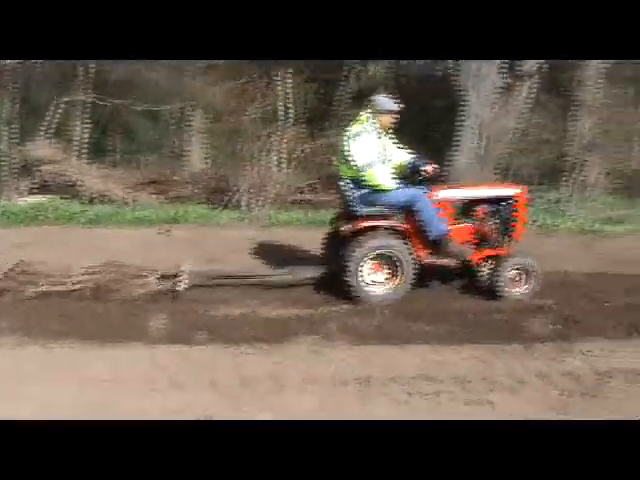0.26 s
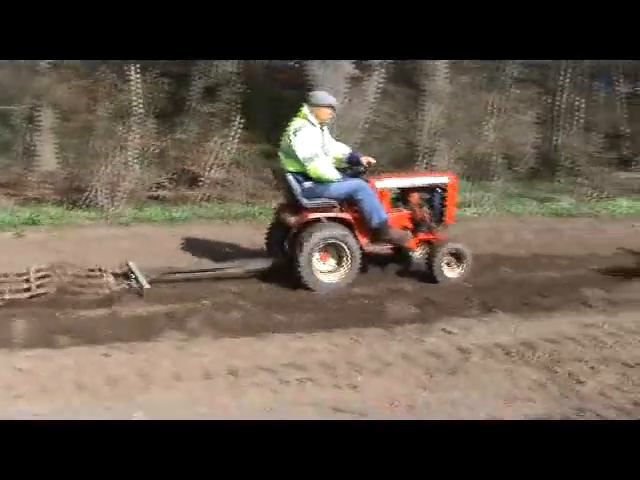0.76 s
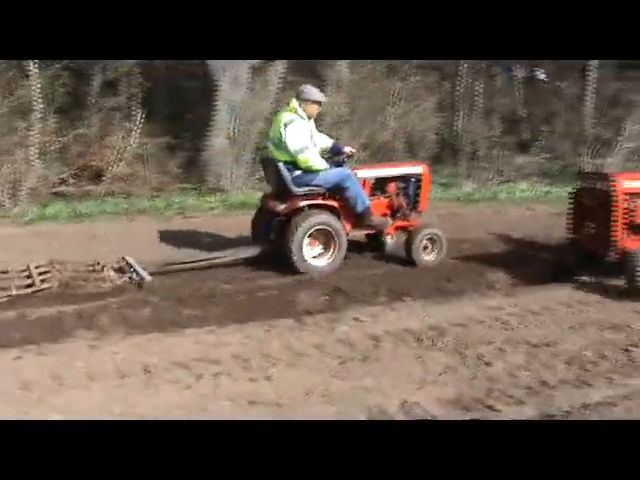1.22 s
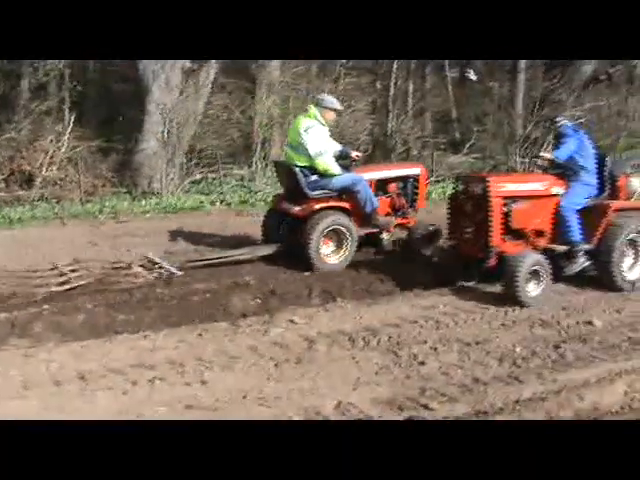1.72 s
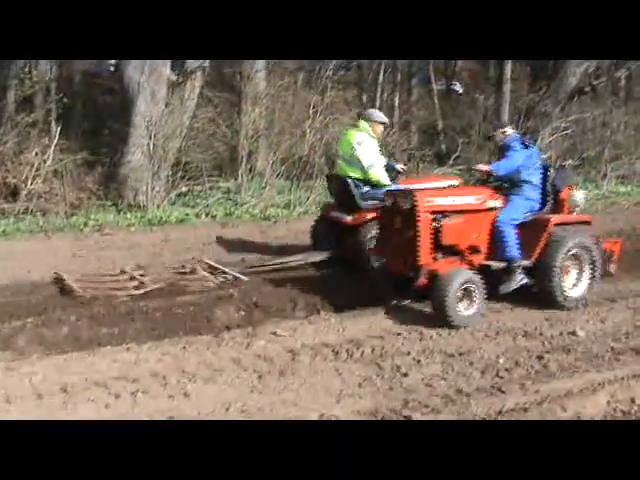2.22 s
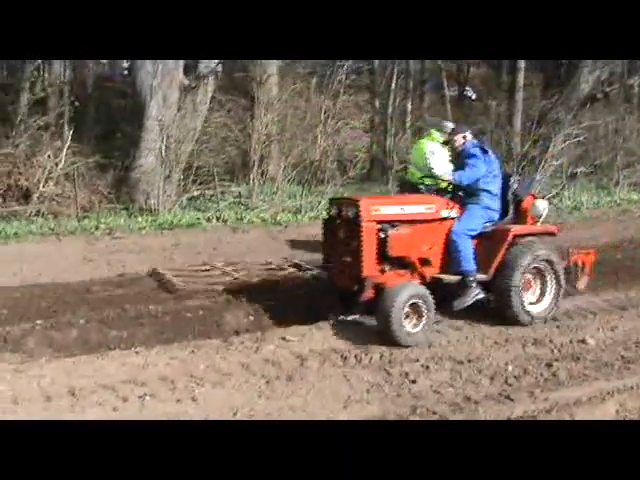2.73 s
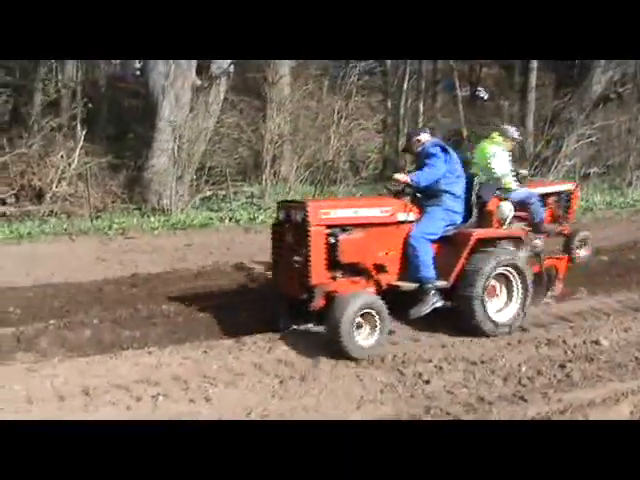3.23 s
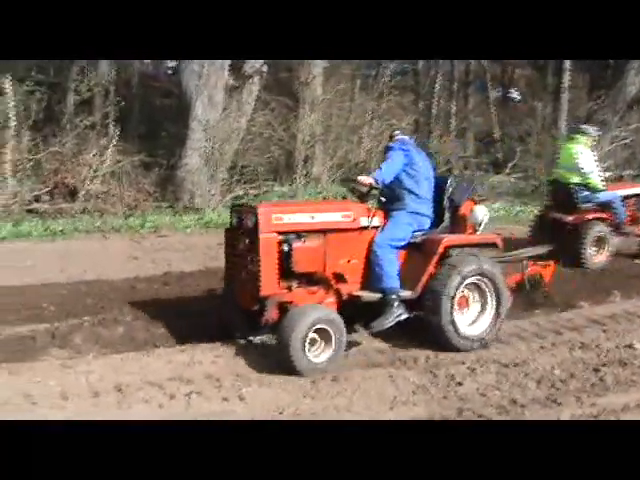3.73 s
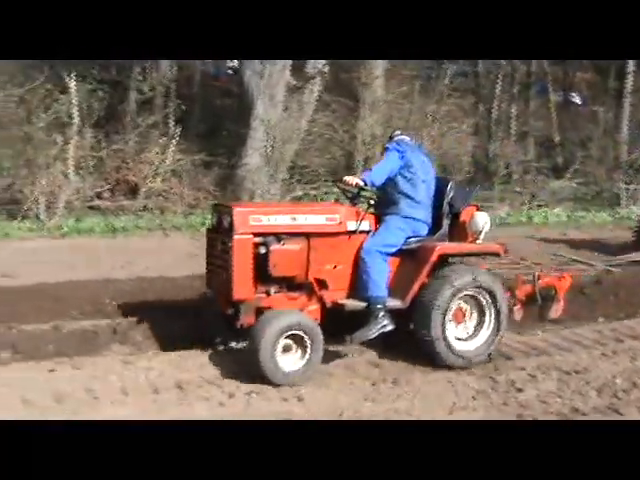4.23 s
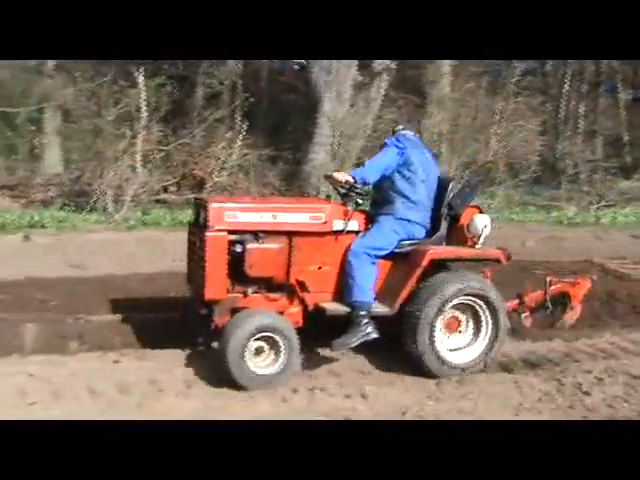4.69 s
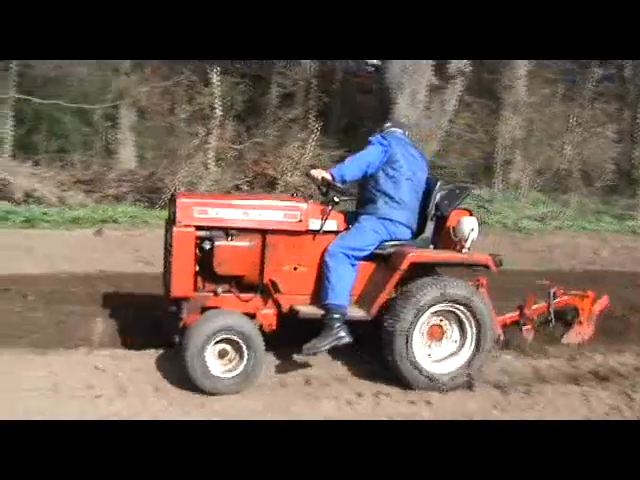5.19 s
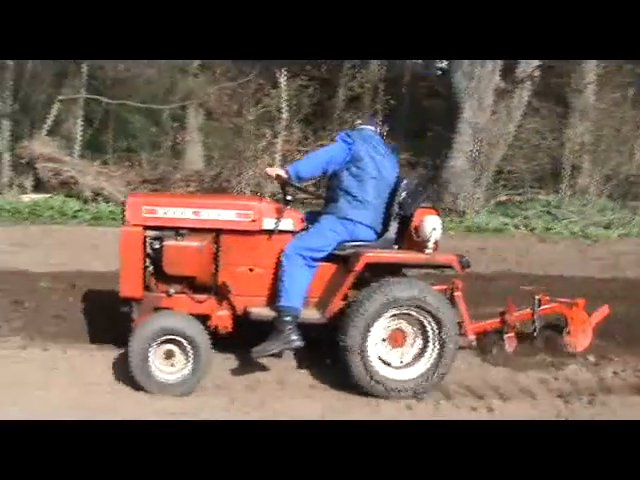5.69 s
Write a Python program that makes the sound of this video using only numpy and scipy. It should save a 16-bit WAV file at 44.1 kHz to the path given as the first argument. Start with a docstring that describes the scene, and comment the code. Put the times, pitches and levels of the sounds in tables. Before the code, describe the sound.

Two small tractor engines chug past in a field, the nearer growing louder and popping, with wind buffeting the microphone at first.

```python
"""A small twin-cylinder tractor puffs strong-weak across tilled soil in an open field: each firing
rings the exhaust pipe and drives a jet of gas that excites the tin silencer shell. A second tractor
passes further off with a slower thump. Running gear washes beneath them, and the links of a dragged
chain harrow squeal by stick-slip friction. Turbulent gusts buffet the two microphone ports, hard at
first, then in short bursts."""
import sys
import numpy as np
from scipy import signal
from scipy.fft import rfft, irfft
from scipy.io import wavfile
from scipy.ndimage import uniform_filter1d

SR = 44100
rng = np.random.default_rng(int(sys.argv[2]) if len(sys.argv) > 2 else 0)


def store_pcm(level_fs):
    """Save levels as 16-bit WAV."""
    pcm = np.round(np.clip(level_fs, -1, 1) * 32767).astype(np.int16)
    wavfile.write(sys.argv[1], SR, np.atleast_2d(pcm).T)


N = 262395

NEAR_FIRING_HZ, FAR_FIRING_HZ = 24.55, 19.3
THUMP_MS, SIGH_MS, GAS_MS, INTAKE_MS = -7.5, -7, -3.5, 21   # onsets from a firing's loudest moment

# Arrival of the firings against a steady beat, from speed drift and distance: time_s, lag_ms
NEAR_FIRING_LAG = [(0, -19.5), (.75, -19.5), (1.0, -17.5), (1.25, -18.4), (2.5, -14.6), (2.75, -17.8),
                   (3.5, -15.7), (3.75, -17.5), (4.25, -17.8), (4.65, -16.2), (5.0, -17.9), (5.25, -17.4),
                   (5.45, -18.9), (5.75, -17.5)]
FAR_FIRING_LAG = [(0, -17), (.8, -12), (1.2, -9), (1.6, -8.3), (2.0, -10), (2.4, -12), (2.8, -13.5),
                  (3.3, -15), (4.0, -14), (5.2, -10), (5.95, -8)]
# Course of the near engine: time_s, thump_db, puff_db, weak_cylinder_db, left_right_db
NEAR_LEVELS = [(0, -38, -48.5, 2, -30), (1.0, -34.5, -45, -1, -14), (1.5, -30.5, -42.5, -0.5, -7),
               (2.0, -32.5, -40, -3.5, -4), (2.5, -27.5, -39.5, -2.5, -3), (3.0, -31.5, -42, 2, -2),
               (3.5, -28.5, -37.5, -2, -3.5), (4.0, -28.5, -37, -5, -4), (4.5, -27, -34, -4.5, -1),
               (5.0, -25, -34.5, -8, -4), (5.5, -33, -35.5, -1.5, -1.5), (5.95, -26, -36, -6, -4)]
# Course of the far engine: time_s, thump_db, bark_db
FAR_LEVELS = [(0, -27, -38), (1.0, -33.5, -34.5), (1.5, -37, -36.5), (2.0, -33, -38.5), (2.5, -35.5, -56),
              (3.0, -35, -38.5), (4.0, -40, -37.5), (5.0, -53, -36), (5.95, -56, -44)]
# Hardest near exhaust pops: time_s, jet_db, sizzle_db, shell_low_db, shell_middle_db, shell_top_db
HARD_POPS = [(1.042, -48, -64, -57, -53, -56), (1.409, -47, -59, -55, -55, -52),
             (1.447, -46, -59, -51, -53, -55), (1.856, -45, -58, -55, -55, -52),
             (1.897, -52, -59, -50, -55, -57), (1.937, -54, -60, -53, -53, -52),
             (2.265, -51, -62, -50, -55, -48), (2.346, -44, -60, -42, -58, -50),
             (2.428, -54, -68, -55, -41, -45), (2.51, -50, -68, -40, -44, -55),
             (2.591, -54, -68, -42, -46, -48), (2.672, -65, -61, -42, -55, -53),
             (2.873, -54, -55, -55, -55, -51), (2.915, -40, -60, -56, -55, -53),
             (2.957, -45, -64, -58, -50, -41), (2.997, -37.5, -56, -54, -55, -41),
             (3.076, -39, -66, -41, -54, -46), (3.159, -48, -62, -43, -52, -48),
             (3.243, -54, -77, -52, -54, -39), (3.324, -60, -61, -55, -58, -42.5),
             (3.405, -52, -64, -35, -39, -53), (3.447, -54, -59, -50, -48, -47),
             (3.489, -42, -56, -39, -52, -49), (3.568, -43, -58, -43, -56, -39),
             (3.61, -57, -57, -55, -55, -55), (3.65, -64, -64, -51, -54, -42),
             (3.73, -49, -68, -36, -55, -48), (3.812, -47, -62, -48, -54, -44),
             (3.852, -52, -57, -55, -55, -53), (3.974, -48, -61, -41, -52, -39),
             (4.055, -63, -68, -39, -56, -44), (4.219, -44, -60, -48, -54, -48),
             (4.301, -47, -55, -51, -48, -38), (4.382, -40, -52, -43, -50, -46.5),
             (4.464, -53, -56, -39, -54, -48), (4.627, -45, -57, -46, -52, -48),
             (4.709, -50, -64, -51, -50, -49), (4.79, -45, -54, -40, -40, -63),
             (4.87, -37, -68, -39, -50, -50), (4.952, -50, -60, -38, -60, -46),
             (5.033, -57, -56, -38, -50, -55), (5.114, -60, -62, -48, -52, -44),
             (5.196, -47, -50, -52, -33.5, -46), (5.277, -42, -57, -35, -39, -35),
             (5.36, -56, -57, -31, -36, -52), (5.439, -48, -55, -37, -55, -35),
             (5.521, -52, -49, -34, -51, -53), (5.603, -36, -55, -35, -56, -40),
             (5.686, -33, -43, -46, -46, -52), (5.766, -38, -51, -48, -42, -44),
             (5.847, -41, -58, -44, -36, -41)]
# Modes of the exhaust pipes, near silencer shell, and bonnet and mudguards: pitch_hz, level_db, t60_s
NEAR_PIPE_MODES = [(70.2, 1, 0.071), (119.3, -3, 0.072), (97, -11.5, 0.054), (151, -39, 0.13),
                   (179.7, -15.5, 0.58), (223, -5.5, 0.034)]
FAR_PIPE_MODES = [(95, -21, 0.083), (114.1, 0.5, 0.14), (142, -5.5, 0.1), (162.5, 1.5, 0.092),
                  (213.4, -14.5, 0.25)]
SHELL_MODES = [(1515, -9, 0.022), (1903, -6, 0.037), (2020, -7.5, 0.038), (3280, -19, .02),
               (3470, -1, 0.013), (4420, -4.5, 0.01), (4840, -3.5, 0.024), (5280, -6, 0.014),
               (5860, -5, .012)]
PANEL_MODES = [(775, -6, 0.047), (1520, 4, 0.021), (1985, 2.5, 0.026), (3482, -4, 0.044),
               (6260, -26, 0.035)]
# Exhaust noise of the near puff, its sizzle and the far bark: frequency_hz, density_db
PUFF_SPECTRUM = [(600, -20), (1500, -3), (3000, 4.5), (5000, 1.5), (8000, 0), (11000, -2.5), (14000, -23),
                 (16000, -15)]
SIZZLE_SPECTRUM = [(8000, -30), (11000, -6), (13000, 7), (15500, -10)]
BARK_SPECTRUM = [(450, 6), (700, 4), (1500, 1.5), (2200, 5), (3500, -2.5), (6000, -7.5), (11000, -16),
                 (16000, -52)]
# Strength of the wind on the ports: time_s, level_db
GUST_LEVELS = [(0, -11.5), (.09, -16), (.13, -14.5), (.16, -17), (.25, -15), (.36, -18.5), (.43, -13),
               (.48, -14), (.54, -19.5), (.66, -12.5), (.7, -18), (.73, -20.5), (.77, -19), (.79, -27),
               (.83, -32), (.87, -41), (.93, -34), (1.05, -52.5), (1.45, -43.5), (1.52, -61), (2.08, -52),
               (2.13, -43), (2.35, -50), (2.55, -39), (2.68, -46), (2.85, -46), (3.05, -49), (3.22, -43),
               (3.27, -36), (3.48, -41), (3.55, -48.5), (3.85, -43.5), (3.91, -36.5), (4.2, -39),
               (4.68, -36.5), (4.72, -24.5), (4.88, -23), (4.955, -22.5), (4.985, -31.5), (5.1, -35),
               (5.7, -33), (5.84, -28.5), (5.95, -29)]
# Wind noise in phase on both ports, in antiphase, and as deep rumble: frequency_hz, density_db
IN_PHASE_SPECTRUM = [(20, -31), (45, -40), (81, -1.5), (173, 1.5), (305, -4.5), (516, -17), (1470, -54),
                     (3000, -69), (6000, -99)]
ANTIPHASE_SPECTRUM = [(20, -40), (59, -31), (124, 0), (242, 2), (436, -2), (768, -15), (1440, -27),
                      (3000, -44), (6000, -63), (12000, -110)]
RUMBLE_SPECTRUM = [(20, -43), (38, 2), (103, 7.5), (181, -1), (400, -29.5), (1000, -101)]
# Fast eddies that slap the ports and flutter: time_s, left_gain, right_gain, flutter_db
FAST_EDDIES = [(0.903, -0.3, 0.19, -25.5), (1.0, 0.054, -0.061, -46), (1.178, -0.14, 0.18, -33.5),
               (1.28, -0.17, 0.099, -35), (1.46, 0.059, -0.051, -43), (2.295, -0.19, 0.16, -37.5),
               (2.42, -0.072, 0.13, -35.5), (2.501, -0.11, 0.14, -41), (2.821, 0.13, -0.074, -41),
               (2.901, 0.054, -0.054, -32.5), (3.256, -0.12, 0.061, -32), (3.481, 0.062, 0.026, -33),
               (3.943, -0.14, 0.14, -39), (4.055, 0.17, -0.16, -30.5), (4.132, 0.013, 0.13, -42),
               (4.149, 0.11, -0.14, -44), (4.319, -0.11, -0.0017, -29), (4.391, -0.15, 0.066, -40),
               (4.45, -0.029, 0.023, -42), (4.547, 0.15, -0.013, -30), (4.642, -0.13, 0.21, -31.5),
               (4.717, -0.16, 0.32, -26.5), (4.828, 0.2, -0.38, -30), (5.018, -0.14, 0.29, -36),
               (5.162, -0.025, 0.0017, -27), (5.253, -0.18, 0.17, -27.5), (5.331, 0.21, -0.28, -30),
               (5.405, 0.067, 0.11, -35), (5.456, 0.097, -0.1, -32), (5.63, 0.081, -0.22, -27.5),
               (5.732, 0.26, -0.097, -38), (5.926, -0.39, 0.38, -20.5)]
# Slow eddies that thud on both ports: time_s, pitch_hz, peak_db
SLOW_EDDIES = [(0.9, 60, -30), (1.168, 55, -36), (1.28, 55, -47), (2.144, 70, -25), (2.3, 45, -25),
               (2.425, 50, -36), (3.003, 45, -42), (3.325, 45, -36), (3.404, 45, -40), (3.922, 55, -26),
               (4.005, 45, -31), (4.178, 55, -27), (4.54, 55, -40), (4.826, 60, -31), (5.029, 55, -27),
               (5.167, 45, -40), (5.278, 55, -31), (5.436, 55, -25), (5.605, 55, -26), (5.758, 55, -34)]
# Course of the wash of running gear, fans and soil: time_s, level_db, treble_db
GEAR_LEVELS = [(0.0, -38.5, -6), (0.5, -38.5, -10), (0.84, -42.5, -3.5), (1.41, -42, -5.5),
               (1.84, -40.5, -2), (2.05, -42.5, -5), (2.4, -41.5, -6), (2.7, -42.5, -13),
               (3.0, -41.5, -8.5), (3.46, -40.5, -0.5), (5.5, -37, -10), (5.95, -37.5, -3)]
# Colour of that wash: frequency_hz, density_db
GEAR_SPECTRUM = [(25, -34), (60, -17), (130, -11), (226, -17), (391, -30), (500, -20), (696, -13),
                 (1000, -18), (1490, -20), (2380, -25), (3300, -22), (3800, -27), (6500, -31), (7500, -36),
                 (10600, -38), (13000, -46), (16000, -56)]
# Squeals of the harrow links: start_s, hold_s, pitch_hz, level_db
LINK_SQUEALS = [(.2, .4, 11570, -68), (0, 1.2, 10400, -71), (.25, .12, 9150, -70), (.55, .25, 9150, -66),
                (.95, .3, 9150, -67), (1.4, .1, 9150, -71), (.7, .4, 6920, -71), (.75, .4, 11570, -73),
                (.55, .65, 6430, -63), (.13, .04, 6180, -63), (.9, .2, 8150, -72), (1.45, .6, 6430, -66),
                (1.45, .1, 11570, -74), (1.75, .3, 11570, -67), (1.75, .35, 9150, -65),
                (1.3, .5, 6920, -71), (1.75, .3, 10400, -71), (3.2, .12, 6920, -62), (3.4, .9, 6920, -68),
                (3.8, .08, 6920, -59), (3.5, .6, 11570, -71), (3.5, .25, 9150, -73), (4.15, .1, 10400, -76),
                (4.3, .12, 6920, -63), (4.7, .5, 6920, -70), (4.55, .5, 11570, -66), (5.0, .15, 9150, -63),
                (5.3, .65, 9150, -65), (5.3, .65, 11570, -77)]


def near_engine():
    """Pulsed flow: each firing rings the pipe and releases turbulent jet noise that excites the shell."""
    thump_db, puff_db, weak_db, left_right_db = in_time(NEAR_LEVELS)
    pop_s, pop_db, sizzle_db, *_ = np.transpose(HARD_POPS)
    beat = NEAR_FIRING_HZ, NEAR_FIRING_LAG
    pulses = firings(*beat, THUMP_MS, spread_db=2.5, alternate_db=-1)
    thump = amp(thump_db) * pipe_thump(pulses, NEAR_PIPE_MODES, open_end_hz=60)
    slugs = amp(puff_db) * firings(*beat, GAS_MS, spread_db=0, alternate_db=weak_db - 2.5)
    jet = burst(slugs + at_times(pop_s - .003, amp(pop_db)), rise_ms=2.1, fall_ms=2.16)
    # The weak cylinder sighs; the intake rattles after the strong one.
    sigh = burst(firings(*beat, SIGH_MS, spread_db=2, alternate_db=18.5), rise_ms=4, fall_ms=7.4)
    intake = burst(firings(*beat, INTAKE_MS, spread_db=5.5, alternate_db=-6), rise_ms=2.5, fall_ms=6.4)
    flow = jet + amp(puff_db - 31.5) * sigh + amp(puff_db - 15) * intake
    hiss = flow * stereo_noise(PUFF_SPECTRUM, side_db=-10.5)
    dull = lowpass(hiss, 9000, order=2)
    gas = dull + amp(-26) * shaken(jet, SHELL_MODES) + amp(-23) * shell_clinks()
    sizzle = burst(at_times(pop_s - .0025, amp(sizzle_db)), rise_ms=1.5, fall_ms=2.2)
    sizzle = sizzle * stereo_noise(SIZZLE_SPECTRUM, side_db=-10)
    closeness = amp(np.minimum(0.52 * (puff_db + 41.5), 0))   # the jet's top is heard only close by
    top = (closeness * (hiss - dull) + sizzle) * pan(0.71, 0.41 * left_right_db)
    return port_delay(thump, slope_db=28) + gas * pan(0.68, left_right_db) + top


def firings(firing_hz, lag, shift_ms, spread_db, alternate_db=0):
    """Combustion as an impulse train of random strengths, with every second one offset in level."""
    lag_ms, = in_time(lag)
    engine_s = np.arange(N) / SR - (lag_ms + shift_ms) / 1000
    number = np.floor(engine_s * firing_hz).astype(int) + 4
    strength = amp(spread_db * rng.uniform(-1, 1, 200)[number] + alternate_db * (number % 2))
    return strength * (np.diff(number, prepend=number[0]) > 0)


def pipe_thump(clicks, modes, open_end_hz):
    """Pipe resonance: the silencer absorbs the treble and the open end radiates little deep bass."""
    rung = sum(amp(db) * ring(clicks, hz, t60) for hz, db, t60 in modes)
    silenced = lowpass(rung, 270, order=4)
    return signal.sosfilt(signal.butter(3, open_end_hz, "high", fs=SR, output="sos"), silenced)


def shell_clinks():
    """Resonant forcing: a hard pop briefly drives each shell mode, favouring low, middle or top ones."""
    pop_s, _, _, *band_db = np.transpose(HARD_POPS)
    scatter_db = 3.9 * rng.standard_normal((len(pop_s), len(SHELL_MODES)))
    clinks = 0
    for k, (hz, db, t60) in enumerate(SHELL_MODES):
        band = (hz > 3000) + (hz > 4000)
        knocks = at_times(pop_s - .002, amp(band_db[band] + db + scatter_db[:, k]))
        force = burst(knocks, rise_ms=0.66, fall_ms=0.91) * np.cos(2 * np.pi * hz * np.arange(N) / SR)
        clinks = clinks + ring(force, hz, t60)
    return clinks


def far_engine():
    """Pipe resonance at a slower firing rate, with a duller bark of gas that forces the panels to ring."""
    thump_db, bark_db = in_time(FAR_LEVELS)
    beat = FAR_FIRING_HZ, FAR_FIRING_LAG
    pulses = firings(*beat, THUMP_MS, spread_db=4)
    thump = amp(thump_db) * pipe_thump(pulses, FAR_PIPE_MODES, open_end_hz=77)
    bark = burst(firings(*beat, GAS_MS, spread_db=1.5), rise_ms=1.4, fall_ms=4.5)
    gas = bark * stereo_noise(BARK_SPECTRUM, side_db=-15)
    panels = amp(-32.5) * shaken(bark + 0.53, PANEL_MODES)
    return port_delay(thump, slope_db=25.5) + amp(bark_db) * (gas + panels) * pan(0.59, -5)[:, None]


def wind_roar():
    """Turbulent pressure meets the ports in lumps: mostly in phase in the bass, in antiphase above."""
    steady_db, = in_time(GUST_LEVELS)
    flutters_db = [swell_db(s, 0, db, rise_db_per_s=348, fall_db_per_s=308) for s, *_, db in FAST_EDDIES]
    gust_db = np.maximum(steady_db, np.max(flutters_db, axis=0))
    # Strong wind leans right and trades rumble for in-phase roar.
    left_right_db = np.interp(steady_db, [-56.5, -23], [7.5, -3])
    rumble_db = np.interp(steady_db, [-21.5, -18], [2.5, -8.5])
    in_phase_db = np.interp(steady_db, [-21.5, -18], [-3, 2.3])
    weakness = np.clip((-36.5 - gust_db) / 25, 0, 1)
    lumps = amp((3 + 15.6 * weakness) * drift(83))   # weak gusts are spikier
    lumps = lumps / np.sqrt(uniform_filter1d(lumps ** 2, size=4410))
    in_phase, antiphase, rumble = rng.standard_normal((3, N)) * lumps
    mid = amp(in_phase_db - 6 * weakness) * coloured(in_phase, IN_PHASE_SPECTRUM)
    mid = mid + amp(rumble_db) * coloured(rumble, RUMBLE_SPECTRUM)
    evenness, overload = 0.27, 0.42   # hard wind evens out its quick swings and flattens at the ports
    power_swing = uniform_filter1d(mid ** 2, size=661) / uniform_filter1d(mid ** 2, size=8820)
    mid = mid * (power_swing + 0.07) ** (-evenness / 2 * (1 - weakness))
    mid = overload / amp(gust_db) * np.tanh(mid * amp(gust_db) / overload)
    side = amp(-1) * coloured(antiphase, ANTIPHASE_SPECTRUM)
    side = side + amp(rumble_db - 12) * coloured(antiphase, RUMBLE_SPECTRUM)
    roar = port_delay(mid, slope_db=26.5) + side * [[1], [-1]]
    return lowpass(amp(gust_db) * roar * pan(0.84, left_right_db), 3500, order=2)


def eddy_slaps():
    """A fast eddy is a pressure transient: a short push balanced by a slow swing back."""
    s, left, right, _ = np.transpose(FAST_EDDIES)
    push_ms, swing_ms = 0.82, 4.5
    t_ms = np.arange(-440, 441) * 1000 / SR
    pulse = np.exp(-(t_ms / push_ms) ** 2) - push_ms / swing_ms * np.exp(-(t_ms / swing_ms) ** 2)
    return np.array([signal.fftconvolve(at_times(s, gains), pulse, "same") for gains in (left, right)])


def eddy_thuds():
    """A slow eddy is a wave packet: about one cycle of pressure under a Gaussian envelope."""
    thuds, reach = np.zeros(N + SR), np.arange(-2000, 2000)
    for s, hz, db in SLOW_EDDIES:
        cycles = reach / SR * hz
        envelope = amp(db) * np.exp(-(cycles / 0.52) ** 2)
        thuds[int(s * SR) + reach] += envelope * np.cos(2 * np.pi * cycles)
    return thuds[:N]


def running_gear():
    """Broadband noise of gear, fans and soil flickers quickly over a resonant hum of the panels."""
    level_db, treble_db = in_time(GEAR_LEVELS)
    wash = stereo_noise(GEAR_SPECTRUM, side_db=-22) * amp(1.52 * drift(68))
    dull = lowpass(wash, 4000, order=1)
    hum = amp(-16) * rms_one(shaken(amp(0.56 * drift(29)), PANEL_MODES))
    gear = dull + amp(treble_db) * (wash - dull) + hum   # brighter when a tractor faces the microphone
    bass = lowpass(gear, 1200, order=1)
    return amp(level_db) * (bass + (gear - bass) * pan(0.89, -4)[:, None])


def harrow_links():
    """Stick-slip friction: many small uneven slips keep each resonance ringing while it squeals."""
    slips_per_s, squeals = 1500, 0
    for hz in sorted({row[2] for row in LINK_SQUEALS}):
        level = sum(amp(swell_db(s, hold_s, db, rise_db_per_s=90, fall_db_per_s=90))
                    for s, hold_s, pitch_hz, db in LINK_SQUEALS if pitch_hz == hz)
        slips = (rng.random(N) < slips_per_s / SR) * rng.standard_normal(N)
        squeals = squeals + level * amp(2.5 * drift(30)) * rms_one(ring(slips, hz, t60=.045))
    return pan(squeals, left_right_db=0.5)


def ring(drive, hz, t60):
    """Damped oscillator: a unit impulse starts a decaying sine of height 1."""
    r, w = amp(-60 / (t60 * SR)), 2 * np.pi * hz / SR
    return signal.lfilter([0, np.sin(w)], [1, -2 * r * np.cos(w), r * r], drive + 1e-18)


def shaken(envelope, modes):
    """Random forcing: independent noise under one envelope drives each mode."""
    noises = rng.standard_normal((len(modes), N))
    return sum(amp(db) * ring(envelope * noise, hz, t60) for (hz, db, t60), noise in zip(modes, noises))


def burst(clicks, rise_ms, fall_ms):
    """Convolution gives each click a smooth attack and an exponential decay."""
    t_ms = np.arange(int(.04 * SR)) * 1000 / SR
    shape = (1 - np.exp(-t_ms / rise_ms)) ** 2 * np.exp(-t_ms / fall_ms)
    return signal.fftconvolve(clicks, shape / shape.max())[:N]


def swell_db(start_s, hold_s, level_db, rise_db_per_s, fall_db_per_s):
    """Exponential growth and decay around a hold: straight lines in decibels, a second each."""
    corners_s = [start_s - 1, start_s, start_s + hold_s, start_s + hold_s + 1]
    corners_db = [level_db - rise_db_per_s, level_db, level_db, level_db - fall_db_per_s]
    return np.interp(np.arange(N) / SR, corners_s, corners_db)


def port_delay(bass, slope_db):
    """Path difference: bass reaches the far port late, so the two differ by the wave's slope."""
    return bass + amp(slope_db) * np.gradient(bass) * [[1], [-1]]


def pan(x, left_right_db):
    """A level difference places the sound between the channels."""
    return np.array([x * amp(left_right_db / 2), x * amp(-left_right_db / 2)])


def stereo_noise(spectrum, side_db):
    """Partly coherent noise: a common signal plus a weaker one in antiphase."""
    mid, side = coloured(rng.standard_normal((2, N)), spectrum)
    return mid + amp(side_db) * side * [[1], [-1]]


def coloured(x, spectrum):
    """Spectral shaping: unit white noise comes out with this spectrum at rms 1."""
    hz = np.maximum(np.fft.rfftfreq(N, 1 / SR), 1)
    hz_points, db_points = np.transpose(spectrum)
    gain = amp(np.interp(np.log(hz), np.log(hz_points), db_points))
    return irfft(rfft(x) * rms_one(gain), N)


def drift(rate_hz):
    """Random modulation at rms 1: noise passed twice through a one-pole low-pass."""
    r = np.exp(-2 * np.pi * rate_hz / SR)
    return rms_one(signal.lfilter([1], [1, -2 * r, r * r], rng.standard_normal(N + SR))[SR:])


def lowpass(x, hz, order):
    """Maximally flat low-pass filter."""
    return signal.sosfilt(signal.butter(order, hz, fs=SR, output="sos"), x)


def at_times(seconds, sizes):
    """Impulses of these sizes at these moments."""
    clicks = np.zeros(N)
    clicks[(np.asarray(seconds) * SR).astype(int)] = sizes
    return clicks


def in_time(rows):
    """Linear interpolation of each column against the first, sample by sample."""
    s, *columns = np.transpose(rows)
    return [np.interp(np.arange(N) / SR, s, column) for column in columns]


def amp(db):
    """Decibels to amplitude ratio."""
    return 10 ** (np.asarray(db) / 20)


def rms_one(x):
    """Normalisation to unit rms."""
    return x / np.sqrt(np.mean(x ** 2) + 1e-20)


def scene():
    """Superposition of both tractors, the harrow and the wind."""
    machines = near_engine() + far_engine() + running_gear() + harrow_links()
    return machines + wind_roar() + eddy_slaps() + eddy_thuds()


def record(dry):
    """Soft saturation rounds the peaks; a steep low-pass limits the bandwidth."""
    ceiling, cutoff_hz = .95, 15850
    rounded = ceiling * np.tanh(dry / ceiling)
    return signal.sosfilt(signal.ellip(14, .5, 100, cutoff_hz, fs=SR, output="sos"), rounded)


dry = scene()
out = record(dry)
store_pcm(out)
```